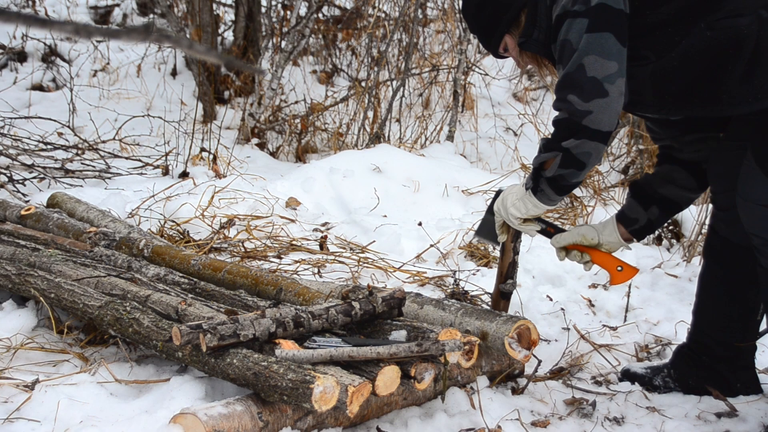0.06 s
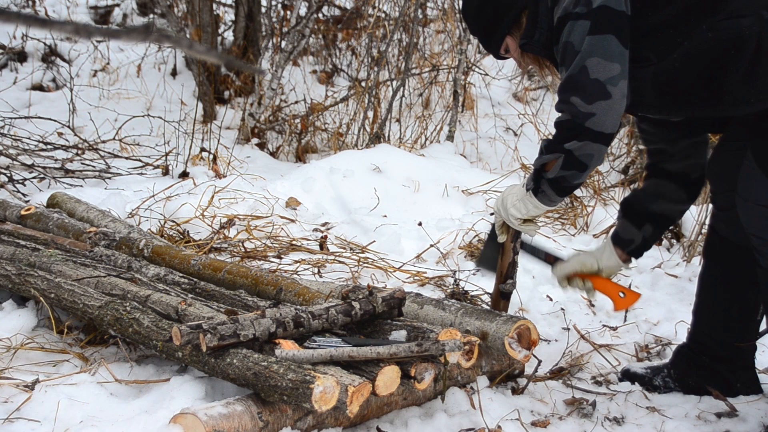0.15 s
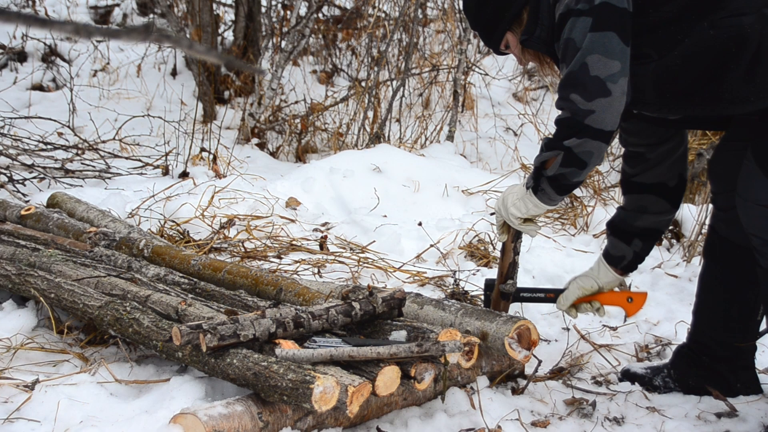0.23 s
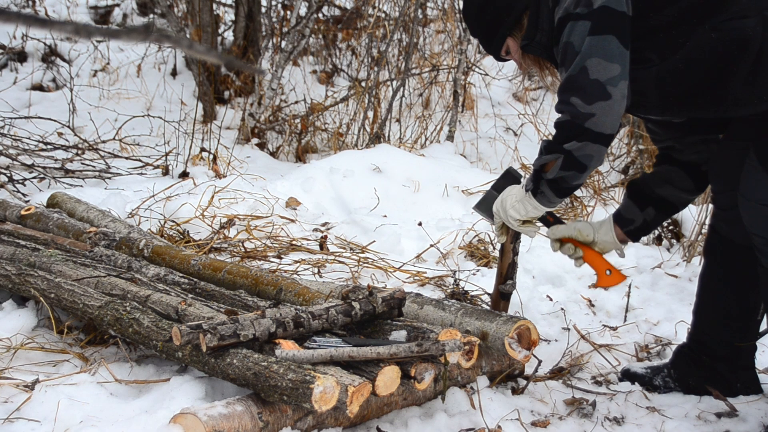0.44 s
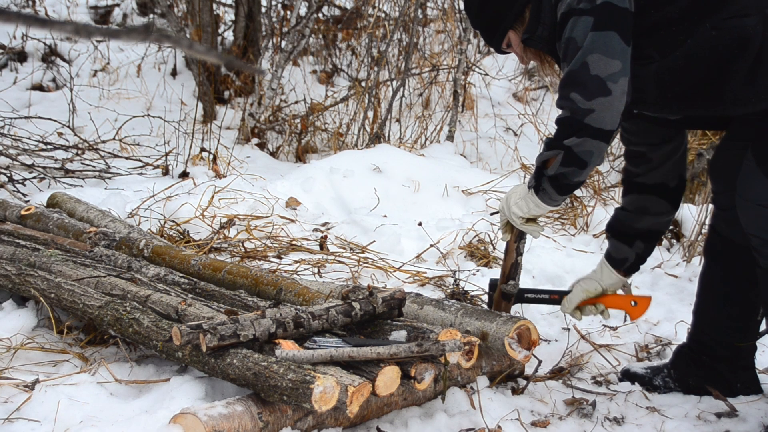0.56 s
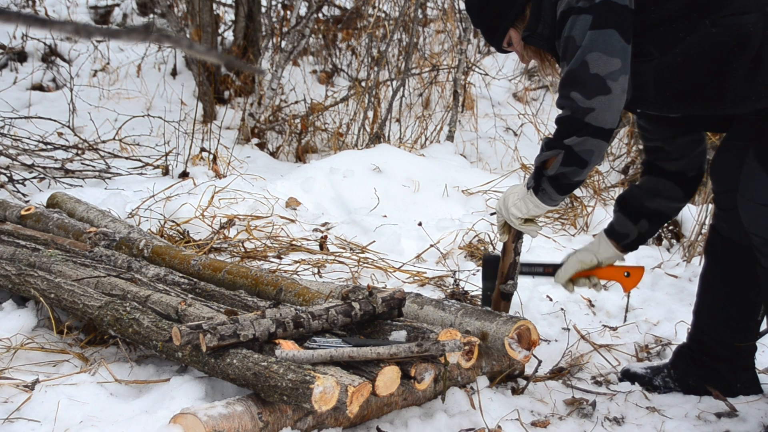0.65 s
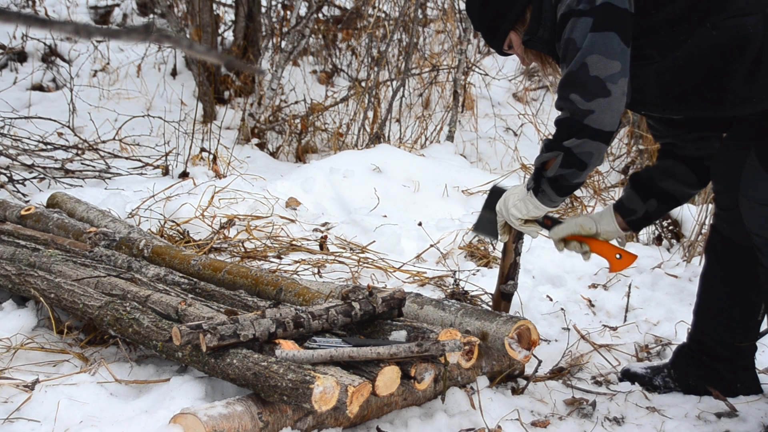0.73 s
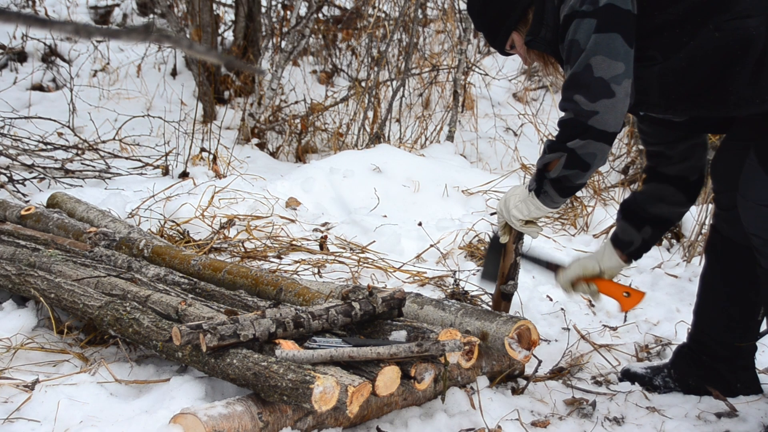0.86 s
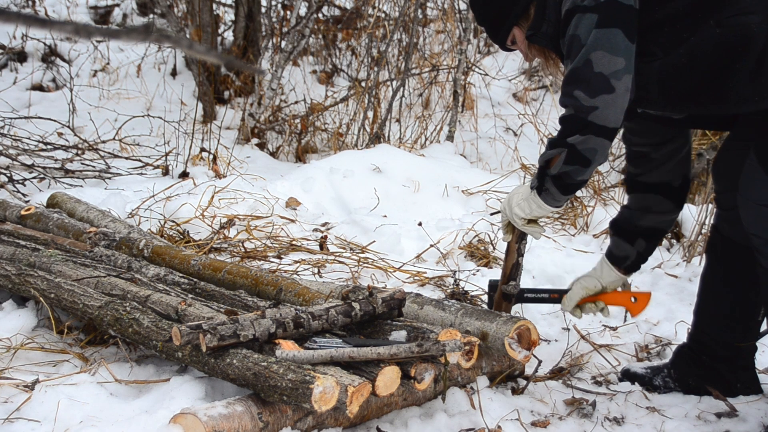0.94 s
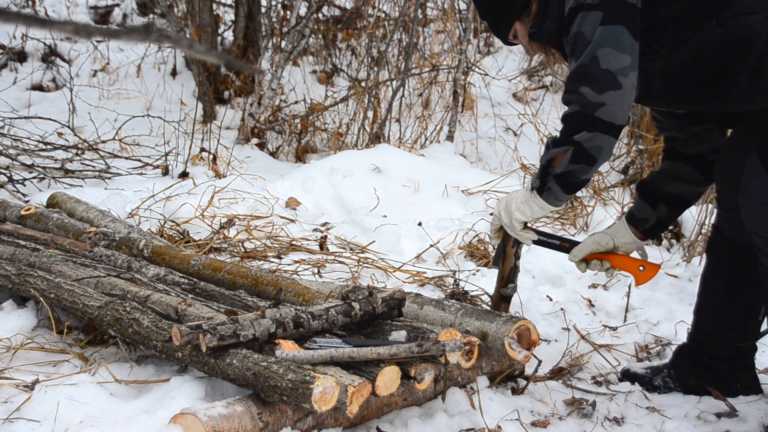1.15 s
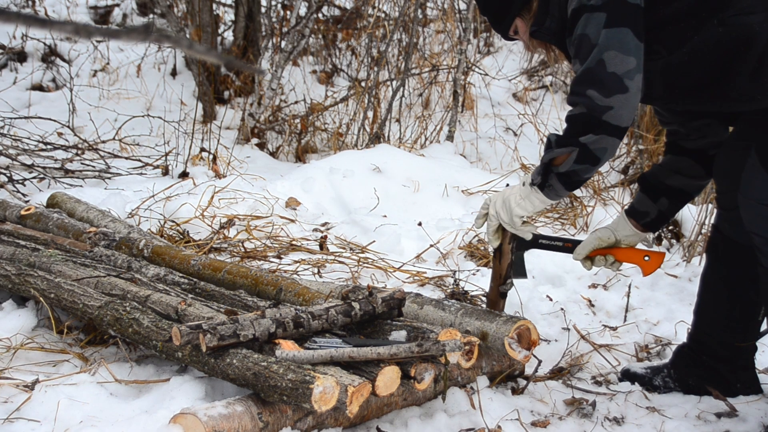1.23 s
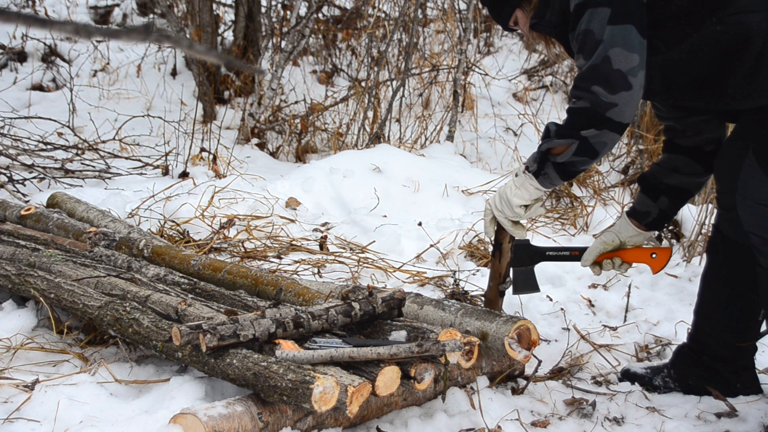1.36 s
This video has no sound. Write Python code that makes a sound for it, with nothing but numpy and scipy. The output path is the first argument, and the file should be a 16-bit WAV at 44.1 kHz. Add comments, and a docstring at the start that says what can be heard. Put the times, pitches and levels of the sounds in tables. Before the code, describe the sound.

A hatchet chops an upright stick three times at even spacing, each a sharp crack and hollow knock on the log below, with soft echoes from trees; close microphone, quiet snowy wood with faint distant rush.

```python
"""A hatchet chops three times into an upright stick in a snowy wood.
A distant noise rush runs throughout; at the start an earlier chop's echo is still fading over it.
Each chop is a bite (damped modes and a noise tick), tearing fibres (dense snaps and a wavering squeak),
then a hollow knock on the log below (more modes and a noise crack) and a soft echo of filtered noise
from the trees. Tiny bark ticks fall between and after the blows; a light scuff ends the scene as the
hatchet is lifted."""
import sys
import numpy as np
from scipy import signal
from scipy.fft import rfft, irfft, next_fast_len
from scipy.io import wavfile
from scipy.ndimage import uniform_filter1d, map_coordinates

SR = 44100
rng = np.random.default_rng(int(sys.argv[2]) if len(sys.argv) > 2 else 0)


def dump(signal):
    """Clip the signal to [-1, 1] and save it as 16-bit WAV at the path in sys.argv[1]."""
    limited = np.clip(np.atleast_2d(signal).T, -1, 1)
    pcm = np.round(limited * 32767).astype(np.int16)
    wavfile.write(sys.argv[1], SR, pcm)


N = 61739  # length [samples]


def amp(db):
    """Decibels to gain."""
    return 10 ** (np.asarray(db) / 20)


def unit(x):
    """Scale to rms 1."""
    return x / np.sqrt(np.mean(x ** 2) + 1e-20)


def along(points, hz):
    """Read (frequency, value) points on a log-frequency axis."""
    f, v = np.transpose(points)
    return np.interp(np.log(hz + 1), np.log(f + 1), v)


def since(s):
    """Seconds since s, zero before."""
    return np.maximum(np.arange(N) / SR - s, 0)


def decay(t, t60):
    """Exponential decay by 60 dB in t60 seconds."""
    return np.exp(-np.log(1000) * t / t60)


def fade(t, t60):
    """Decay that is silent until t leaves zero."""
    return (t > 0) * decay(t, t60)


def coloured(x, colour):
    """Minimum-phase filter with the given colour, so nothing sounds before its cause."""
    m = 2 * next_fast_len(N)
    log_gain = np.log(amp(along(colour, np.fft.rfftfreq(m, 1 / SR))))
    cepstrum = irfft(log_gain, m)
    # folding the cepstrum onto positive time makes the filter causal
    cepstrum[1:m // 2] *= 2
    cepstrum[m // 2 + 1:] = 0
    return irfft(rfft(x, m) * np.exp(rfft(cepstrum)), m)[:N]


def burst(envelope, colour):
    """Noise of random signs under an envelope, through a colour scaled to unit power."""
    power = np.mean(amp(along(colour, np.linspace(0, SR / 2, SR // 10))) ** 2)
    noise = np.sign(rng.standard_normal(N))
    return coloured(envelope * noise, colour) / np.sqrt(power)


def ring(s, modes, attack):
    """Damped modes struck at s with a smooth attack; neighbours swing in opposite directions."""
    t = since(s)
    rise = 1 - np.exp(-(t / attack) ** 2)
    total = np.zeros(N)
    for k, (hz, db, t60) in enumerate(modes):
        total += (-1) ** k * amp(db) * fade(t, t60) * np.sin(2 * np.pi * hz * t)
    return rise * total


# blade meets wood: (time [s], clack level [dB])
BITES = [(0.2256, -8), (0.5646, -3), (0.9241, -4.5)]
# wood modes of the clack: (frequency [Hz], relative level [dB], T60 [s])
CLACK_MODES = [(565, -13.5, 0.019), (904, -3.5, 0.0058), (1424, 4, 0.0065), (1596, -2, 0.0061),
               (2220, -19, 0.013), (2960, -6.5, 0.017)]
# noise colour shared by the edge tick and the knock's crack: (frequency [Hz], relative level [dB])
CRACK_COLOUR = [(100, -21), (250, -1), (700, 1.5), (1400, 5.5), (1850, 3.5), (2500, -3.5), (3800, 1),
                (4600, -12), (5200, -7.5), (6400, -6), (7700, -10.5), (9800, -12.5), (11500, -28),
                (15500, -45)]
BITE_ATTACK_S = 0.00038
EDGE_DB, EDGE_T60_S = -18, 0.016  # edge tick, level relative to the clack


def bites():
    """The edge hits: short damped wood modes give a dead clack, a noise burst gives the tick."""
    clack = sum(amp(db) * ring(s, CLACK_MODES, BITE_ATTACK_S) for s, db in BITES)
    edge = sum(amp(db + EDGE_DB) * fade(since(s), EDGE_T60_S) for s, db in BITES)
    return clack + burst(edge, CRACK_COLOUR)


# blade sinks in: (time [s], length [s], tearing level [dB], squeak level [dB], centre squeak pitch [Hz])
TEARS = [(0.227, 0.0034, -35.5, -22.5, 3012), (.5672, .012, -26, -28, 3208),
         (0.9242, 0.0067, -24.5, -20, 3073)]
# noise colour of the fibres: (frequency [Hz], relative level [dB])
TEAR_COLOUR = [(300, -22), (1000, -5.5), (2000, -5), (2600, 1.5), (3400, 4.5), (4200, -7), (5200, 0.5),
               (6400, -6.5), (8700, -2.5), (10500, -16), (15500, -37)]
SNAPS_PER_S, SNAP_SPREAD_DB, TEAR_T60_S = 12000, 5, 0.01
SQUEAK_WANDER, SQUEAK_WANDER_PER_S = 0.027, 400  # share of the pitch; changes per second


def tearing():
    """Dense tiny snaps and an unsteady squeak hold while the blade moves through the wood, then die."""
    snap_happens = rng.random(N) < SNAPS_PER_S / SR
    snaps = unit(snap_happens * amp(SNAP_SPREAD_DB * rng.standard_normal(N)))
    drift = map_coordinates(rng.standard_normal(N // 10), [since(0) * SQUEAK_WANDER_PER_S])
    wander = 1 + SQUEAK_WANDER * drift
    force, squeak = np.zeros(N), np.zeros(N)
    for s, length, tear_db, squeak_db, hz in TEARS:
        started = since(s) > 0
        moving = started * decay(since(s + length), TEAR_T60_S)
        phase = 2 * np.pi * hz * np.cumsum(wander * started) / SR
        force += amp(tear_db) * moving
        squeak += amp(squeak_db) * moving * np.sin(phase)
    return burst(force * snaps, TEAR_COLOUR) + squeak


# stick lands on the log:
# (time [s], low modes level [dB], upper modes level [dB], crack level [dB], ground level [dB])
KNOCKS = [(0.232, 3.5, -2, -9, 1), (0.5777, -16, -14.5, -21.5, -8.5), (0.9305, -9, -12, -11, -2)]
# hollow body of stick and log: (frequency [Hz], relative level [dB], T60 [s])
LOW_MODES = [(298.6, -9.5, 0.02), (464.8, 3.5, 0.036), (544, 4.5, 0.017)]
# harder knock of stick and log: (frequency [Hz], relative level [dB], T60 [s])
UPPER_MODES = [(820, -21, 0.01), (852, -27.5, 0.083), (1088, -0.5, 0.026), (1317, 3, 0.012),
               (1586, -3.5, 0.0088), (2030, -16, 0.042), (2328, -2.5, 0.018), (3030, -7, 0.014),
               (3830, -17, 0.02), (5050, -15, 0.0072), (6280, -34, 0.013)]
# dull shove of the stick, alike at every landing: (frequency [Hz], level [dB], T60 [s])
PUSH_MODES = [(214, -26.5, 0.014)]
# the frozen ground takes the blow: (frequency [Hz], relative level [dB], T60 [s])
GROUND_MODES = [(29.6, -55.5, 0.48), (68, -41.5, 0.21), (112.3, -28, 0.069)]
LOW_ATTACK_S, UPPER_ATTACK_S, PUSH_ATTACK_S, GROUND_ATTACK_S = 0.0055, 0.0024, 0.00063, 0.016
CRACK_T60_S = 0.011


def knocks():
    """The stick slams on the log: a noise crack, then modes for shove, hollow ring and faint ground thud."""
    body, crack = np.zeros(N), np.zeros(N)
    for s, low_db, upper_db, crack_db, ground_db in KNOCKS:
        body += amp(low_db) * ring(s, LOW_MODES, LOW_ATTACK_S)
        body += amp(upper_db) * ring(s, UPPER_MODES, UPPER_ATTACK_S)
        body += ring(s, PUSH_MODES, PUSH_ATTACK_S)
        body += amp(ground_db) * ring(s, GROUND_MODES, GROUND_ATTACK_S)
        crack += amp(crack_db) * fade(since(s), CRACK_T60_S)
    return body + burst(crack, CRACK_COLOUR)


# glove and bark scuff: (time [s], width [s], level [dB])
SCUFFS = [(1.319, 0.0078, -54), (1.305, 0.053, -73)]
# noise colour of the scuff: (frequency [Hz], relative level [dB])
SCUFF_COLOUR = [(400, -21), (1000, -1), (1450, 6), (2300, -8), (3000, 3.5), (4900, -3.5), (6000, -16),
                (8000, -13), (12000, -36)]
SCUFF_GRAIN_DB = 3.5


def scuffing():
    """Glove rubs bark: grainy noise swells and falls in bell-shaped strokes."""
    strokes = sum(amp(db) * np.exp(-.5 * ((since(0) - s) / width) ** 2) for s, width, db in SCUFFS)
    grain = unit(amp(SCUFF_GRAIN_DB * rng.standard_normal(N)))
    return burst(strokes * grain, SCUFF_COLOUR)


# tiny ticks of bark: (time [s], level [dB])
TICKS = [(.3705, -58.5), (.837, -61), (1.276, -57)]
# noise colour of the ticks: (frequency [Hz], relative level [dB])
TICK_COLOUR = [(1000, -12), (5000, -4), (8700, -2), (14000, -23)]
TICK_T60_S = 0.015


def bark_ticks():
    """Bits of bark tick: tiny decaying noise bursts."""
    ticks = sum(amp(db) * fade(since(s), TICK_T60_S) for s, db in TICKS)
    return burst(ticks, TICK_COLOUR)


TREBLE_FROM_HZ, TREBLE_FULL_HZ = 2540, 4030  # the treble shift grows between these
ECHO_PATCHY_DB = 2.2
ECHO_DELAY_S, ECHO_RISE_S = 0.00099, 0.0027


def scatter(s, colour, t60s, treble_db):
    """A patchy diffuse noise tail from s on; each frequency dies at its own speed."""
    hz, t, spectrum = signal.stft(burst(1, colour), SR, nperseg=512)
    patches = rng.standard_normal(spectrum.shape)
    patches = uniform_filter1d(patches, size=2, axis=0)  # across frequency
    patches = unit(uniform_filter1d(patches, size=4, axis=1))  # across time
    treble = along([(TREBLE_FROM_HZ, 0), (TREBLE_FULL_HZ, treble_db)], hz)[:, None]
    dying = decay(np.maximum(t - s, 0), along(t60s, hz)[:, None])
    gain = amp(treble + ECHO_PATCHY_DB * patches) * dying
    tail = signal.istft(spectrum * gain, SR)[1][:N]
    return tail * (1 - np.exp(-since(s + ECHO_DELAY_S) / ECHO_RISE_S))


# each chop comes back blurred:
# (time [s], near trunks level [dB], far trees level [dB], treble shift [dB])
ECHOES = [(0.235, -32.5, -39.5, -5.5), (0.571, -37.5, -45.5, 4), (0.927, -35.5, -43.5, 5.5)]
# colour of the near trunks: (frequency [Hz], relative level [dB])
NEAR_COLOUR = [(100, -12.5), (450, 12), (800, 1.5), (1300, -6.5), (2100, -3), (3300, -0.5), (4500, -9.5),
               (6500, -7), (8600, -6), (10500, -20), (13000, -29), (15500, -33)]
# dying away of the near trunks: (frequency [Hz], T60 [s])
NEAR_T60 = [(200, 0.23), (1500, 0.24), (4000, .27), (8000, 0.27), (15000, 0.23)]
# colour of the far trees: (frequency [Hz], relative level [dB])
FAR_COLOUR = [(100, -24), (450, 5.5), (800, 1.5), (1300, 5), (2100, -3), (3100, -5.5), (4500, -16),
              (8500, -22.5), (11000, -38), (15000, -42)]
# dying away of the far trees: (frequency [Hz], T60 [s])
FAR_T60 = [(200, 0.67), (1500, 0.58), (4000, 0.72), (12000, 1)]


def trees():
    """Trees scatter each chop: near trunks answer bright and short, far ones duller and longer."""
    echo = np.zeros(N)
    for s, near_db, far_db, treble_db in ECHOES:
        echo += amp(near_db) * scatter(s, NEAR_COLOUR, NEAR_T60, treble_db)
        echo += amp(far_db) * scatter(s, FAR_COLOUR, FAR_T60, treble_db)
    return echo


# colour of the echo left from an earlier chop: (frequency [Hz], relative level [dB])
FADING_COLOUR = [(80, -36), (300, -7.5), (1200, -4.5), (3000, -14), (5500, -20.5), (8500, -24.5),
                 (12000, -37), (16000, -39)]
FADING_DB, FADING_T60_S = -52.5, 0.61


def fading_echo():
    """The last of an earlier chop's echo: coloured noise decaying from the start."""
    return burst(amp(FADING_DB) * fade(since(0), FADING_T60_S), FADING_COLOUR)


# colour of the distant rush: (frequency [Hz], relative level [dB])
AIR_COLOUR = [(15, -53), (25, -24), (59, -20), (165, -10.5), (248, -3), (414, 0), (771, -6), (957, -12.5),
              (1190, -16), (1290, -23), (1470, -21), (1880, -21), (2040, -24.5), (2970, -28.5),
              (3690, -32.5), (4580, -35.5), (5690, -35), (7450, -38), (15900, -52.5)]
AIR_DB, AIR_WAVER_DB = -50.5, -0.07


def air():
    """A far rush: coloured noise, steady but for a minute waver."""
    waver = map_coordinates(rng.standard_normal(N // 100), [since(0) * 20])  # 20 changes per second
    return burst(amp(AIR_DB + AIR_WAVER_DB * waver), AIR_COLOUR)


def scene():
    """Chops, their echoes, and the quiet wood."""
    chops = bites() + tearing() + knocks()
    handling = scuffing() + bark_ticks()
    return (chops + handling + trees() + fading_echo() + air())[None]


# narrow dip of the microphone: (frequency [Hz], level [dB])
MIC_NOTCH = [(5350, -1), (5720, -11.5), (6150, -2)]
TOP_HZ = 16000


def record(dry):
    """The microphone has a narrow notch, rounds off the highest peaks and passes nothing from TOP_HZ up."""
    heard = coloured(dry[0], MIC_NOTCH)
    rounded = heard / (1 + np.abs(heard / .9) ** 8) ** (1 / 8)  # approaches a ceiling of 0.9
    m = 2 * next_fast_len(N)
    passed = np.fft.rfftfreq(m, 1 / SR) < TOP_HZ
    return irfft(rfft(rounded, m) * passed, m)[None, :N]


dry = scene()
out = record(dry)
dump(out)
```